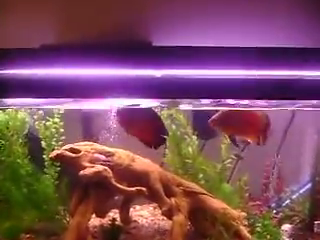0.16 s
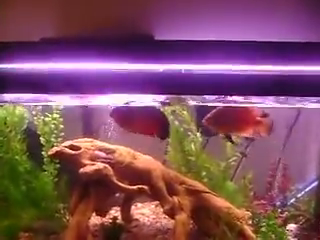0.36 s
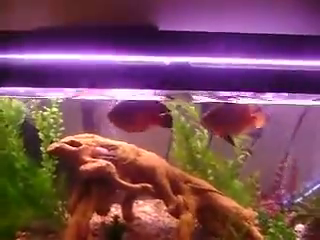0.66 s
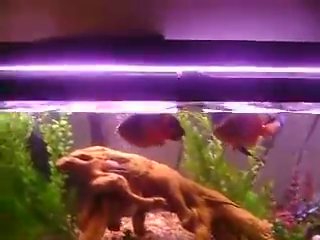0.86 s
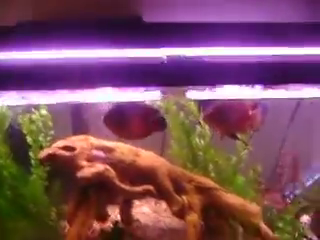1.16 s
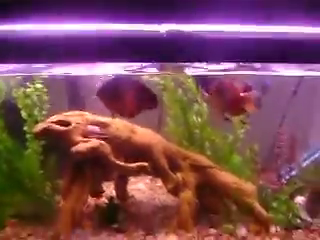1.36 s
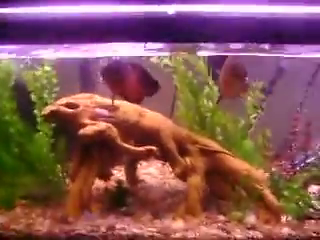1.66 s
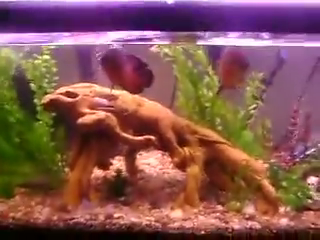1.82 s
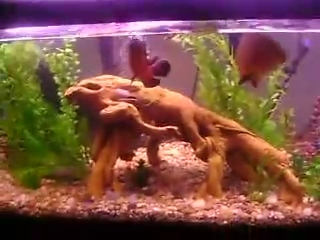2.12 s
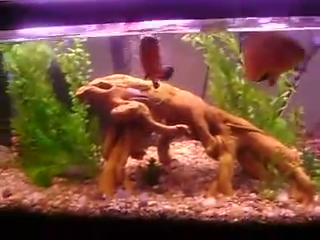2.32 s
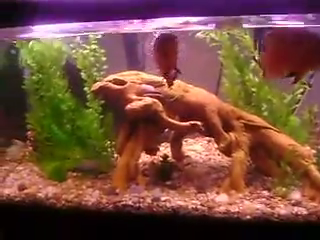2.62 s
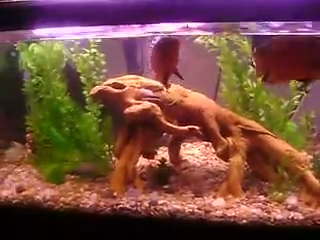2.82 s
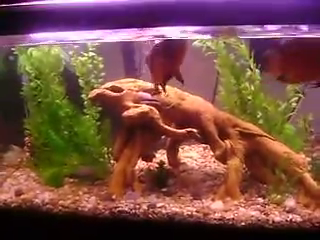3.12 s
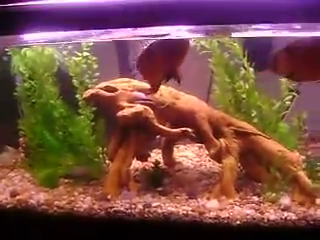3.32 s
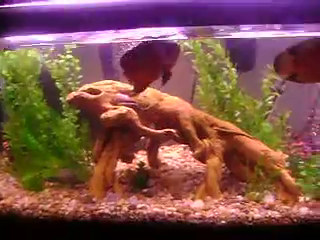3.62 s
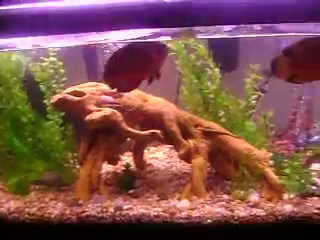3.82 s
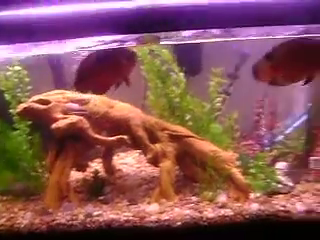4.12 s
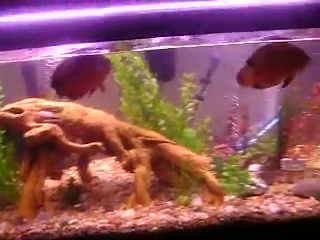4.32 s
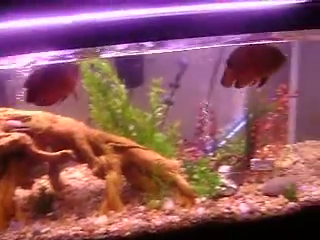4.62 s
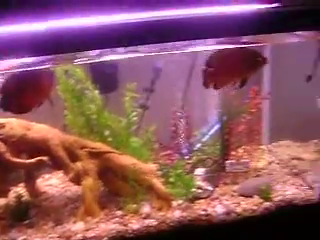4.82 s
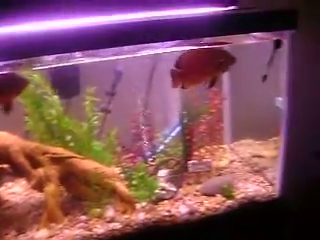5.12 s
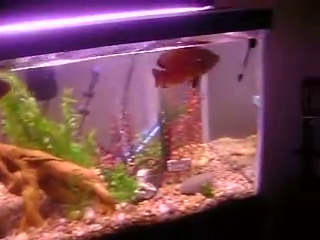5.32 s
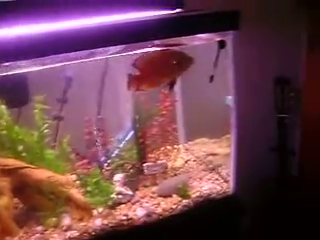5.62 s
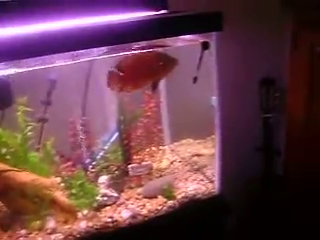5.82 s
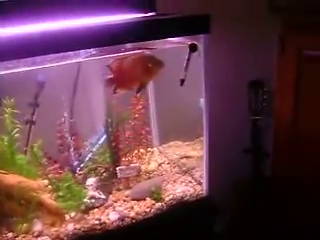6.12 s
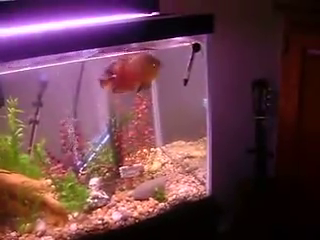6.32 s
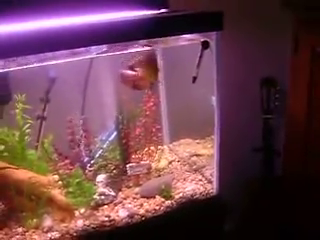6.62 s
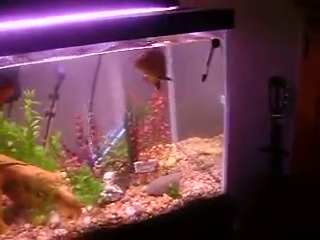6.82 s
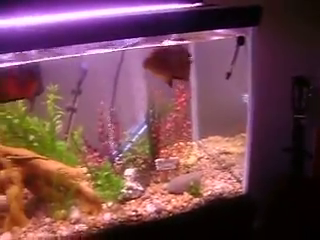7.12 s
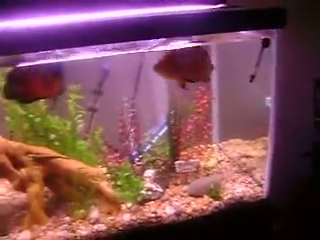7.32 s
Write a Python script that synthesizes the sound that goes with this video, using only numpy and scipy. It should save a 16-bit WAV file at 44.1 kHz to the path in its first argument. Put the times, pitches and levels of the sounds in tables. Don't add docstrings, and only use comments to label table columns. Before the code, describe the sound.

Fish tank water trickles, bubbles and fizzes steadily over a faint pump hum, with a hard plastic snap early and a hollow knock later.

```python
import sys
import numpy as np
from scipy import signal
from scipy.io import wavfile
from scipy.ndimage import uniform_filter1d

SR = 44100
rng = np.random.default_rng(int(sys.argv[2]) if len(sys.argv) > 2 else 0)


def generate_wav(sig):
    pcm = np.round(np.clip(np.atleast_2d(sig).T, -1, 1) * 32767).astype(np.int16)
    wavfile.write(sys.argv[1], SR, pcm)


def ratio(d):
    e = np.asarray(d, float) / 20
    return 10 ** e


N = 328986
MAINS_HZ = 60.03


def band(x, lo_hz, hi_hz):
    sos = signal.butter(2, [lo_hz, hi_hz], "band", fs=SR, output="sos")
    y = signal.sosfilt(sos, x)
    return y / np.std(y)


def walk(rate):
    hold = int(SR / rate)
    steps = np.repeat(rng.standard_normal(N // hold + 1), hold)
    return 1.1 * uniform_filter1d(steps, hold)[:N]


def curve(table, column):
    rows = np.array(table)
    return np.interp(np.arange(N) / SR, rows[:, 0], rows[:, column])


def add(out, s, sound):
    i = int(s * SR)
    out[i:i + len(sound)] += sound[:max(N - i, 0)]


def fade(t, t60):
    return np.exp(-np.log(1000) * t / t60)


def ring(hz, t60, rise_s, glide):
    t = np.arange(int(t60 * SR)) / SR
    shape = (1 - np.exp(-t / rise_s)) ** 2 * fade(t, t60)
    phase = 2 * np.pi * hz * t * (1 + glide * t / t60)
    return shape / shape.max() * np.sin(phase)


# (time [s], flow level [dB], favoured pitch of large bubbles [Hz])
FLOW = [(0.0, -44.5, 1065), (0.98, -43.5, 989), (1.64, -44.5, 967), (1.78, -42.5, 795), (1.85, -44.5, 1118),
        (2.22, -44.5, 885), (2.53, -43, 1090), (2.83, -44.5, 907), (3.51, -47, 1030), (3.74, -47, 793),
        (3.86, -43.5, 1037), (4.17, -44.5, 930), (5.15, -44, 1013), (5.48, -44.5, 1058), (6.0, -43.5, 860),
        (6.34, -46, 1028), (7.04, -46, 953), (7.46, -46, 1074)]
# (pitch [Hz], spread [share], rate [bubbles/s], level [dB], ring length [cycles])
BUBBLE_KINDS = [
    (1000, 0.12, 190, -3.5, 19),
    (1351, .2, 140, -2.5, 14),
    (2112, 0.072, 90, -5, 26),
    (4255, .25, 300, 0, 10),
]
SIZE_EDGES_HZ = [1200, 3000]
STREAM_DB = [-5, -8, -10.5]


def bubbling():
    most = 3500
    streams = np.zeros((3, N))
    favoured_hz = curve(FLOW, column=2) * np.exp(0.047 * walk(12))
    for hz, spread, per_s, db, cycles in BUBBLE_KINDS:
        times = np.cumsum(rng.exponential(size=most)) / per_s
        chance = rng.standard_normal((most, 2))
        loud = np.minimum(rng.exponential(size=most), 1.6)
        drift = (favoured_hz / hz) ** (0.692 * (hz < SIZE_EDGES_HZ[0]))
        stream = streams[np.searchsorted(SIZE_EDGES_HZ, hz)]
        for s, (size, length), extra in zip(times, chance, loud):
            if s < N / SR:
                pitch = min(hz * drift[int(s * SR)] * np.exp(spread * size), 6000.)
                t60 = 2 * cycles * np.exp(0.37 * length) / pitch
                add(stream, s, ratio(db + 3.7 * extra) * ring(pitch, t60, 0.0011, 0.061))
    large, middle, fine = streams / streams.std(axis=1, keepdims=True)
    hiss = band(rng.standard_normal(N), 1800., 8000.)
    fine = fine + 0.65 * ratio(4.7 * walk(25)) * hiss
    total = np.zeros(N)
    for stream, db in zip([large, middle, fine], STREAM_DB):
        total += stream * ratio(db + 1.5 * walk(4))
    return total * ratio(curve(FLOW, column=1))


# (time [s], peak level [dB], pitch [Hz])
PLOPS = [(0.061, -31.5, 1366), (0.24, -32, 1050), (0.295, -32.5, 1240), (0.464, -25, 1077),
         (0.579, -25.5, 1060), (1.198, -27.5, 1000), (1.53, -34, 1000), (1.759, -29, 683),
         (1.837, -29.5, 1202), (2.033, -26, 1073), (2.517, -26.5, 1056), (2.872, -34, 766),
         (3.001, -31, 1070), (3.029, -29.5, 750), (3.308, -35, 1064), (3.71, -26.5, 743), (3.821, -33, 897),
         (4.377, -33, 910), (4.411, -29, 1136), (4.63, -32.5, 994), (4.89, -31, 1066), (5.044, -18, 1010),
         (5.092, -34.5, 1030), (5.159, -27, 970), (5.688, -28, 1015), (6.346, -19.5, 1042),
         (6.858, -22.5, 1000), (6.919, -23, 960), (7.261, -25, 1134), (7.359, -26, 1027)]
# (time [s], peak level [dB], pitch [Hz])
PLINKS = [(1.261, -29.5, 2120), (1.3, -34.5, 2650), (1.6616, -31, 2260), (2.8, -33, 2277),
          (3.3842, -29.5, 2210), (4.4817, -37.5, 2100), (5.231, -34, 1655), (5.7758, -27.5, 2100),
          (6.6448, -36, 2170), (7.1781, -31.5, 1890)]
# (time [s], peak level [dB], pitch [Hz])
SPITS = [(0.557, -39, 4440), (0.5968, -31.5, 4550), (1.4316, -36.5, 4710), (1.7773, -38.5, 4520),
         (2.062, -35.5, 4450), (3.068, -30, 4800), (3.9972, -38, 3340), (4.0694, -37.5, 4900),
         (4.2915, -35, 4930), (4.61, -40, 3400), (5.3093, -34.5, 3440)]


def plops():
    out = np.zeros(N)
    t = np.arange(1500) / SR
    for rows, t60 in [(PLOPS, 0.0453), (PLINKS, 0.036)]:
        for s, db, hz in rows:
            late, detune = rng.random(2)
            twin_hz = hz * (1 + 0.1427 * (detune - .5))
            tick = rng.standard_normal(len(t)) * np.exp(-t / 0.0062)
            add(out, s, ratio(db - 7.5) * ring(hz, t60, 0.002, 0.04))
            add(out, s + .012 + .014 * late, ratio(db - 10.0) * ring(twin_hz, t60, 0.0014, 0.021))
            add(out, s, ratio(db - 15.5) * tick)
    for s, db, hz in SPITS:
        spray = band(rng.standard_normal(len(t)), hz / 1.25, hz * 1.25)
        add(out, s, ratio(db - 2.0) * spray * fade(t, 0.024))
    return out


def tank(x):
    t60, wet_db = 0.19, -5
    t = np.arange(SR // 2) / SR
    echoes = rng.standard_normal(len(t)) * fade(t, t60) * (t > .004)
    echoes /= np.linalg.norm(echoes)
    wet = signal.fftconvolve(x, echoes)[:N] * ratio(wet_db)
    return (x + wet) / np.sqrt(1 + ratio(2 * wet_db))


# (pitch [Hz], level [dB], time to fade 60 dB [s])
LATCH = [(80, -27.5, 0.033), (336, -17, 0.014), (1000, -19, .03), (1400, -16, 0.014), (1535, -9.5, 0.017),
         (2030, -2, 0.0062), (2597, -11.5, 0.014), (3460, -6.5, 0.0047), (3882, -14.5, .012),
         (4670, -13, .009), (5100, -18.5, .009)]
# (pitch [Hz], level [dB], time to fade 60 dB [s])
CASE = [(364, -22.5, 0.047), (460, -16.5, 0.011), (537, -1, 0.0066), (704, -8, 0.0099), (948, -10, 0.014),
        (1190, -15, 0.012), (1500, -18, 0.014), (1930, -12, .0068), (2830, -12, 0.012), (4670, -30, 0.0037)]
# (pitch [Hz], level [dB], time to fade 60 dB [s])
BUTTON = [(950, -5.5, 0.0099), (1400, -4.5, 0.0055), (1700, 1, 0.0068), (2100, 0.5, 0.009),
          (2650, -9, 0.011), (5050, -3, 0.0076)]
# (time [s], peak level [dB], pitch the struck spot favours [Hz], reach [octaves], crack level [dB])
LATCH_HITS = [
    (1.5657, 3.5, 2800, 3.1, -15),
    (1.5676, -4.5, 2800, 0.93, -15),
    (1.5692, -8, 1400, 0.41, -11.5),
    (1.5802, -19, 1400, 0.41, -11),
    (1.5828, -22, 1700, .6, -6),
    (1.585, -17, 1600, .8, -5.5),
    (1.604, -27, 2400, .6, -6),
    (1.6154, -24, 2000, .6, -6),
    (1.661, -28.5, 1500, 0.86, -6),
]
# (time [s], peak level [dB], pitch the struck spot favours [Hz], reach [octaves], crack level [dB])
CASE_HITS = [(.4758, -15, 1100, 1, -16), (.483, -20, 910, .3, -22), (.49, -30, 623, 0.46, -10),
             (0.497, -23, 1500, .3, -16), (2.7813, -9.5, 760, .5, -26), (6.1667, -5, 537, 2.3, -17.5),
             (6.17, -9, 790, 0.42, -22.5), (6.171, -9, 1800, 1.5, -16), (6.1778, -14, 460, 0.16, -22),
             (6.1815, -12, 460, 0.18, -21), (6.195, -22.5, 475, 0.17, -13), (6.198, -24, 480, .3, -18),
             (6.203, -21, 448, 0.27, -20), (6.236, -30, 700, 0.21, -29)]
# (time [s], peak level [dB], pitch the struck spot favours [Hz], reach [octaves], crack level [dB])
BUTTON_HITS = [
    (1.1006, -20.5, 2200, 4, -9),
    (1.1045, -23, 950, 0.36, -10),
    (1.346, -25.5, 2500, 4, -7),
    (1.356, -32, 1200, .8, -8),
]
# (time [s], level [dB])
RUB = [(1.15, -73), (1.27, -46), (1.45, -57), (1.608, -41), (1.618, -34), (1.662, -37), (1.675, -45),
       (1.8, -52), (1.9, -87)]


def shell():
    out = np.zeros(N)
    t = np.arange(600) / SR
    for modes, hits, push_cycles in [(BUTTON, BUTTON_HITS, .7), (LATCH, LATCH_HITS, .55), (CASE, CASE_HITS, .75)]:
        for s, db, spot_hz, reach, crack_db in hits:
            for hz, mode_db, t60 in modes:
                loss_db = 8.1 * (np.log2(hz / spot_hz) / reach) ** 2
                add(out, s, -ratio(db + mode_db - loss_db) * ring(hz, t60, push_cycles / hz, 0))
            noise = band(rng.standard_normal(len(t)), spot_hz * 0.47, min(spot_hz * 6.8, 7000.))
            add(out, s, ratio(db + crack_db) * noise * np.exp(-t / 0.0027))
    grit = rng.standard_normal(N) * ratio(2.8 * walk(150))
    rub_db = curve(RUB, column=1)
    treble = ratio(.5 * (rub_db + 37)) * band(grit, 2200., 6000.)
    return out + (.7 * band(grit, 1300., 2700.) + 0.73 * treble) * ratio(rub_db)


# (multiple of mains, level [dB], lag [rad])
HUM = [(1, -56, -1), (2, -60.5, 3.5), (3, -63, 3.5), (4, -59, 4.5), (5, -63.5, 2), (6, -62, 0.8),
       (7, -64.5, 5), (8, -66.5, 3.5)]
# (time [s], gain [dB])
STANCE = [(0, 1), (.7, -2), (1.2, 1.5), (2.0, 1), (3.0, 0), (4.0, 0), (4.7, -1.5), (5.4, -1.5), (6.2, -1.5),
          (7.46, -1.5)]


def pump():
    turn = 2 * np.pi * MAINS_HZ * np.arange(N) / SR
    stance_db = curve(STANCE, column=1)
    out = np.zeros(N)
    for k, db, lag in HUM:
        level_db = db + (k > 1) * stance_db + 0.36 * k * walk(9)
        phase = k * turn + lag + 0.11 * k * walk(14)
        out += np.sqrt(2) * ratio(level_db) * np.sin(phase)
    return out


# (pitch [Hz], level [dB per Hz])
AIR = [(15, -19), (30, -10.5), (45, -12), (85, -11.5), (150, -7), (242, -3.5), (400, -2.5), (634, -5),
       (958, -3.5), (1520, -15.5), (2190, -5.5), (2690, -12.5), (4770, -18), (5600, -13)]


def air():
    rows = np.array(AIR)
    out = np.zeros(N)
    stroke = np.cos(2 * np.pi * MAINS_HZ * np.arange(N) / SR)
    for hz in 21 * 2 ** np.arange(0, 8.1, .5):
        density_db = np.interp(np.log(hz), np.log(rows[:, 0]), rows[:, 1])
        db = density_db + 10 * np.log10(hz) + 1.4 * walk(11)
        puff = 1 + 0.342 * stroke / (1 + (hz / 320.0) ** 2)
        out += ratio(db) * puff * band(rng.standard_normal(N), hz / 2 ** 0.25, hz * 2 ** 0.27)
    return out / np.std(out) * ratio(-47)


def scene():
    water = tank(bubbling() + plops())
    return (water + shell() + pump() + air())[None]


def low_pass(x):
    return signal.sosfilt(signal.butter(12, 17010, fs=SR, output="sos"), x)


def record(dry):
    top_hz, overload = 5512, .72
    cut = signal.firwin(125, top_hz, window=("kaiser", 7.5), fs=SR)
    narrow = signal.fftconvolve(dry, cut[None], "same")
    mix = np.clip(narrow, -overload, overload)
    return low_pass(mix)


dry = scene()
out = record(dry)
generate_wav(out)
```